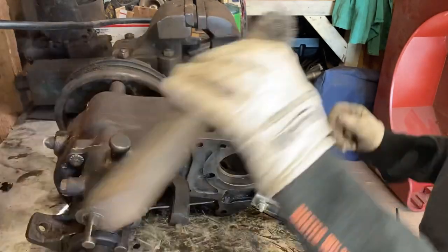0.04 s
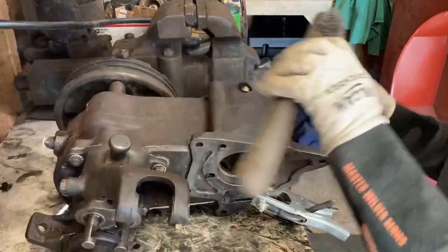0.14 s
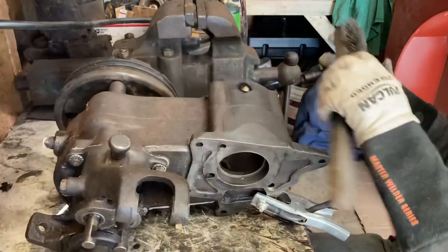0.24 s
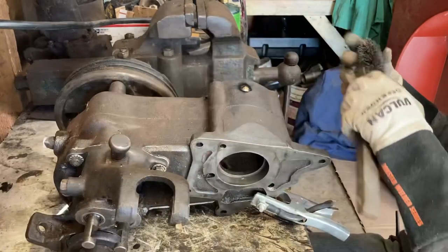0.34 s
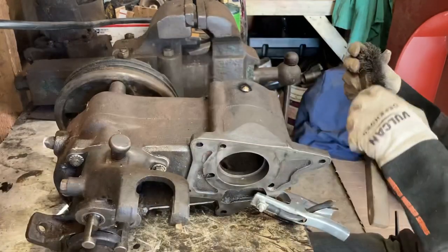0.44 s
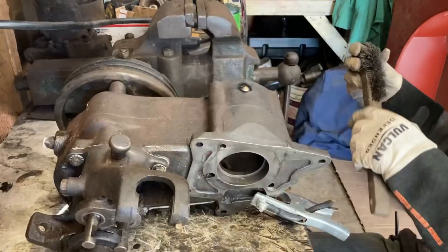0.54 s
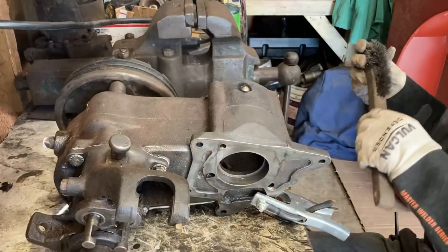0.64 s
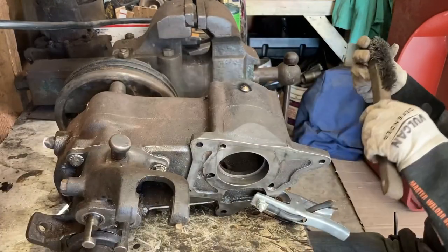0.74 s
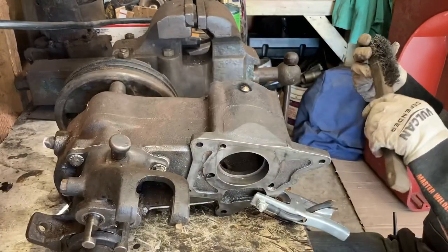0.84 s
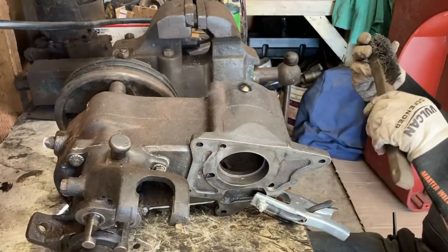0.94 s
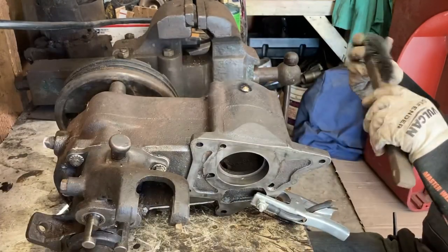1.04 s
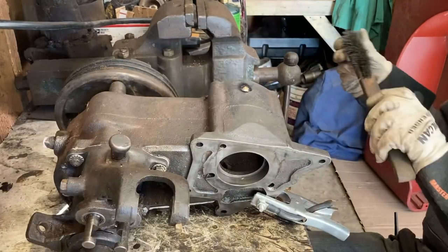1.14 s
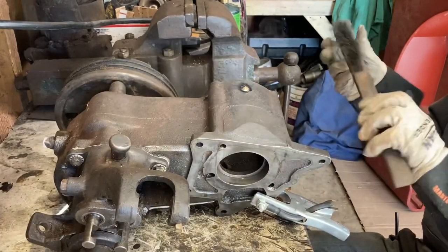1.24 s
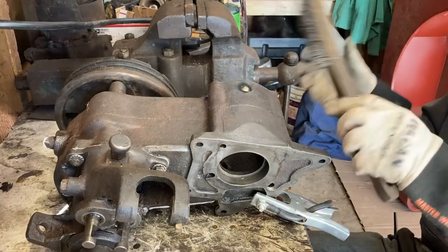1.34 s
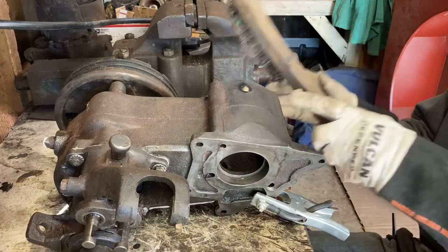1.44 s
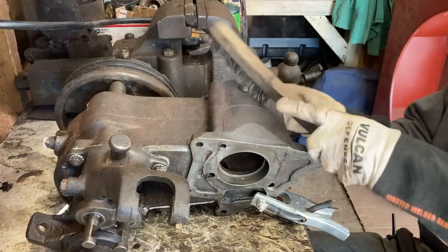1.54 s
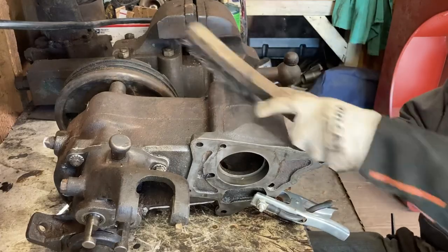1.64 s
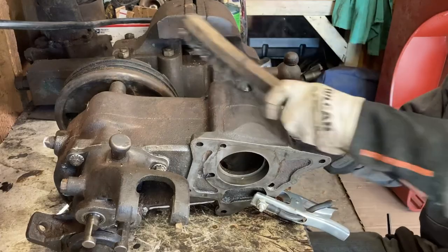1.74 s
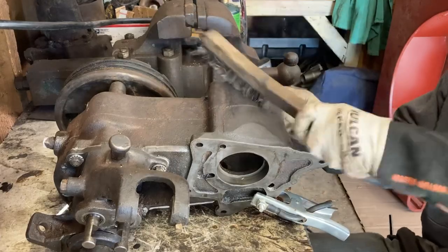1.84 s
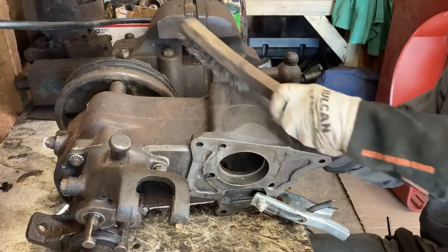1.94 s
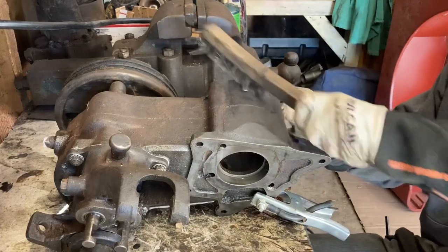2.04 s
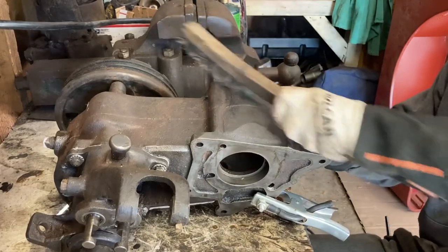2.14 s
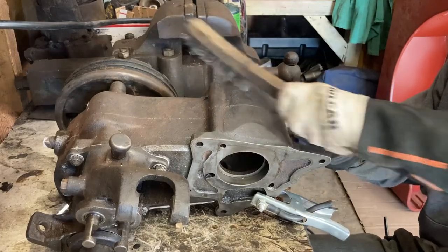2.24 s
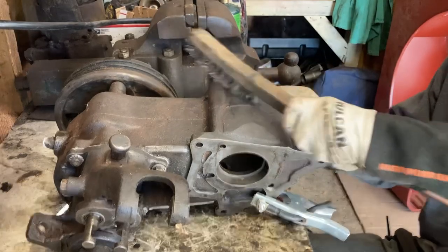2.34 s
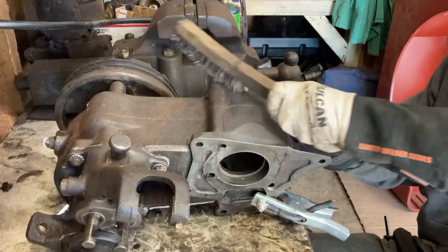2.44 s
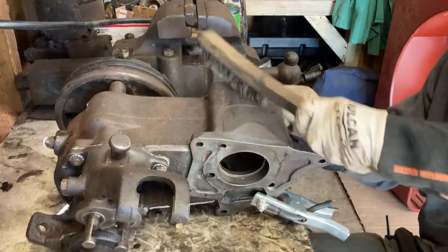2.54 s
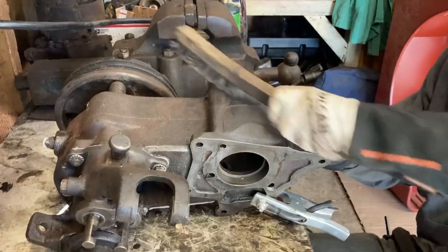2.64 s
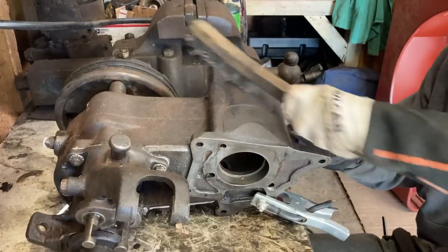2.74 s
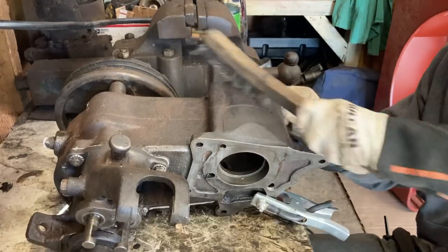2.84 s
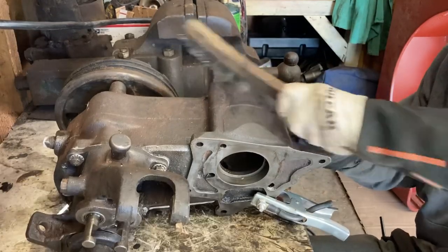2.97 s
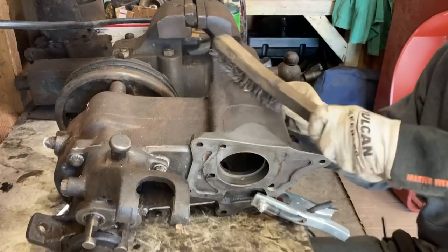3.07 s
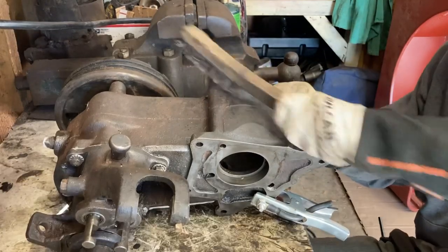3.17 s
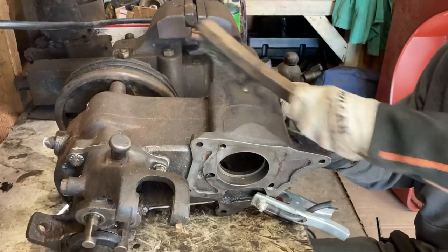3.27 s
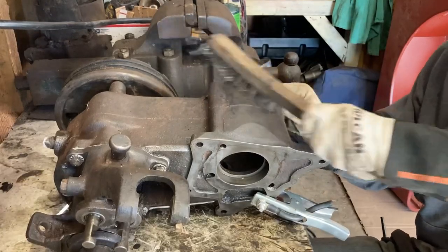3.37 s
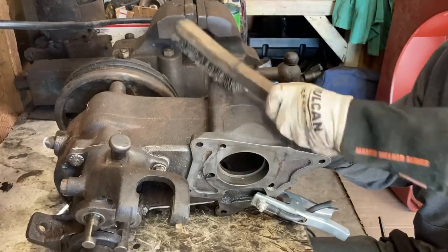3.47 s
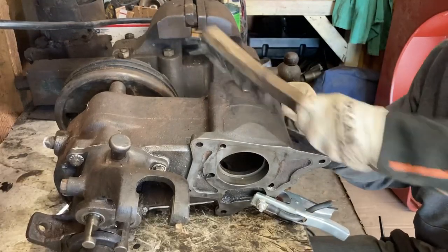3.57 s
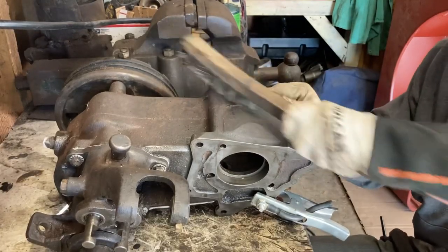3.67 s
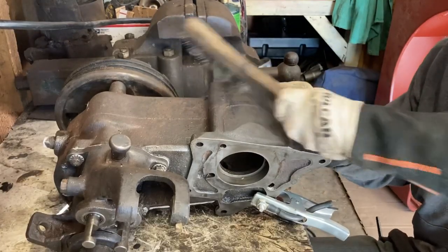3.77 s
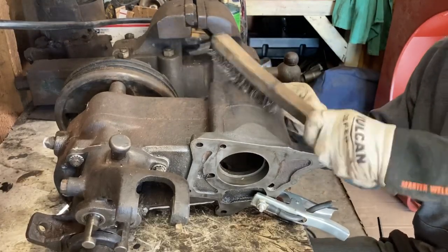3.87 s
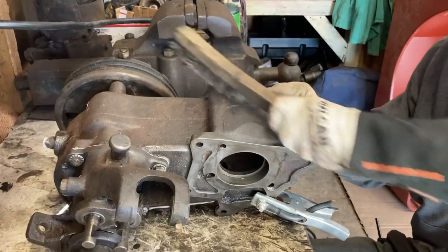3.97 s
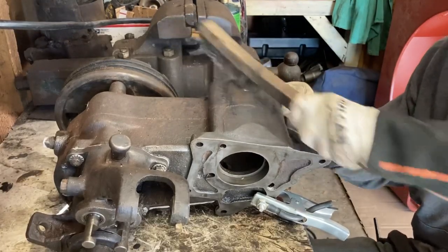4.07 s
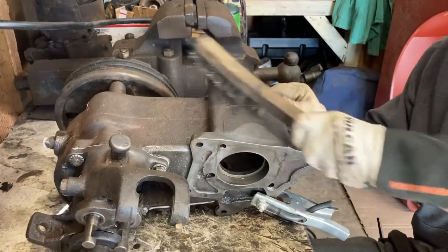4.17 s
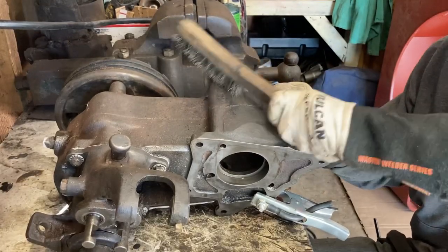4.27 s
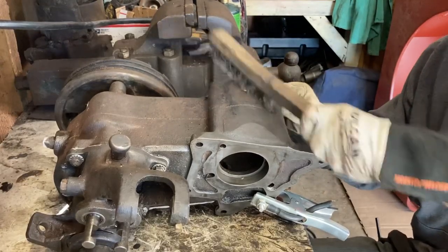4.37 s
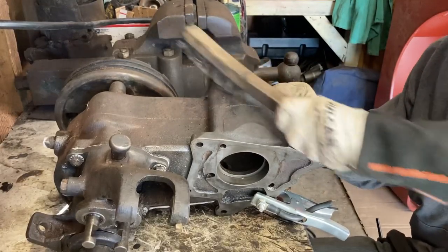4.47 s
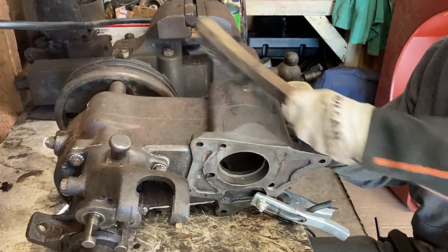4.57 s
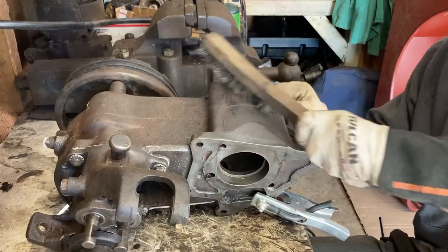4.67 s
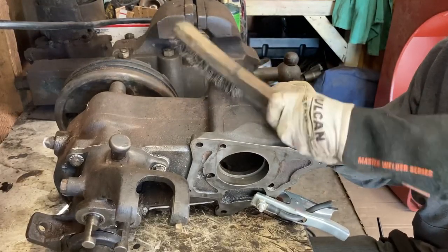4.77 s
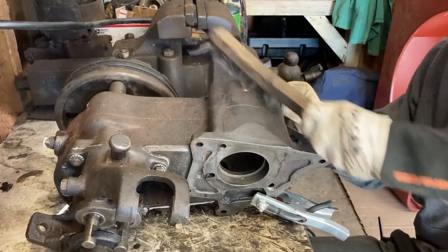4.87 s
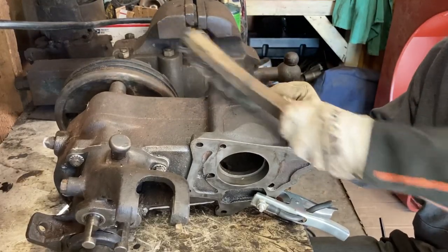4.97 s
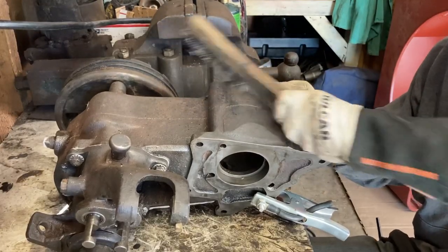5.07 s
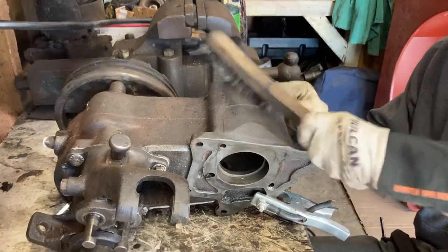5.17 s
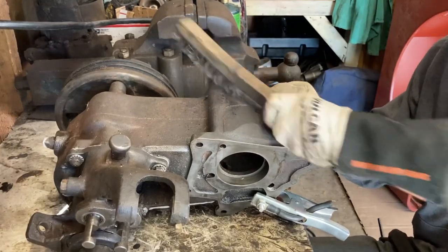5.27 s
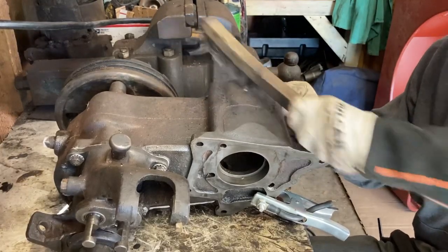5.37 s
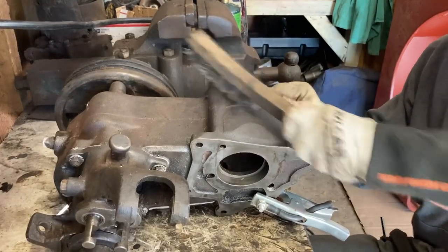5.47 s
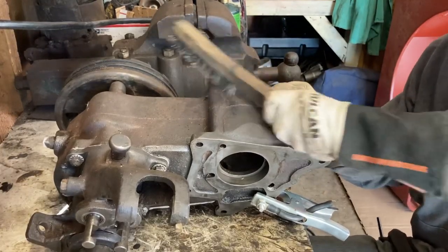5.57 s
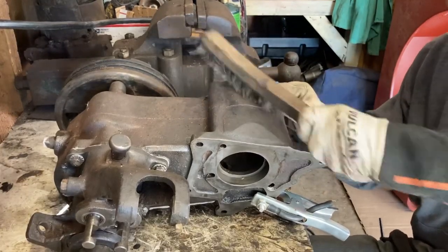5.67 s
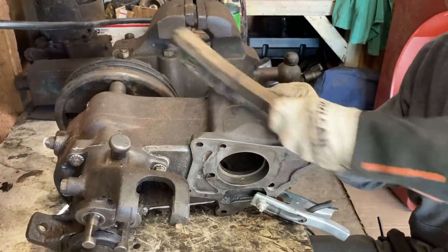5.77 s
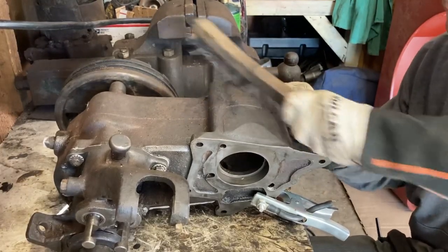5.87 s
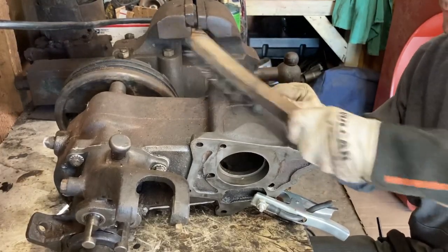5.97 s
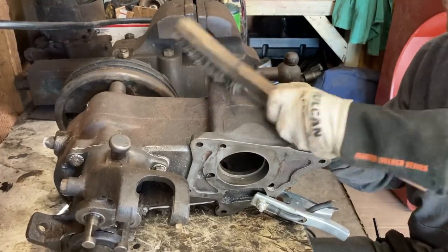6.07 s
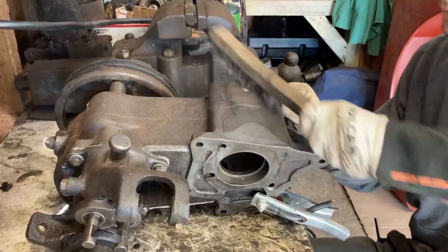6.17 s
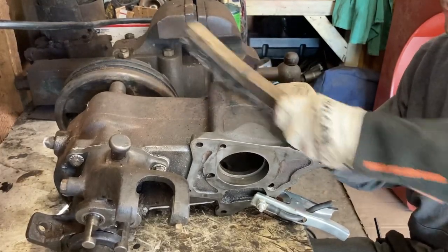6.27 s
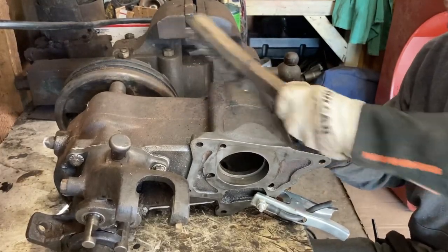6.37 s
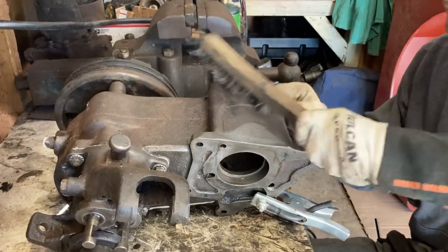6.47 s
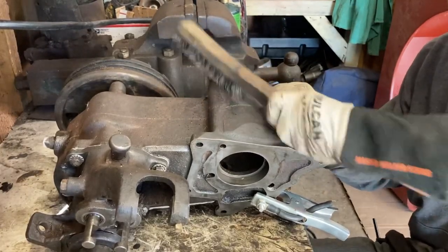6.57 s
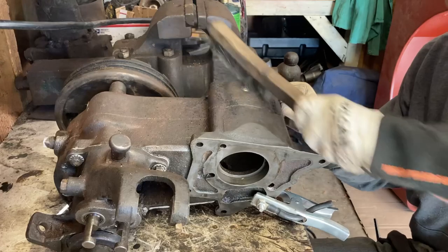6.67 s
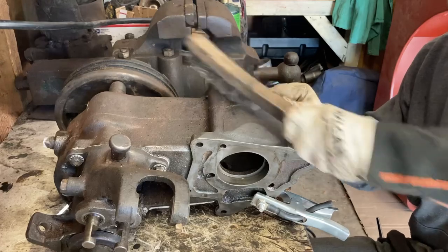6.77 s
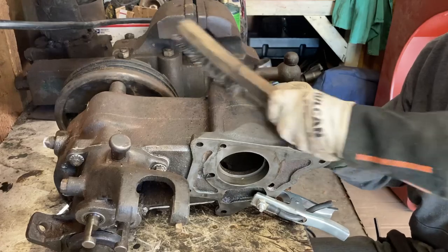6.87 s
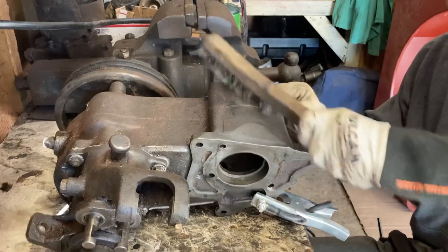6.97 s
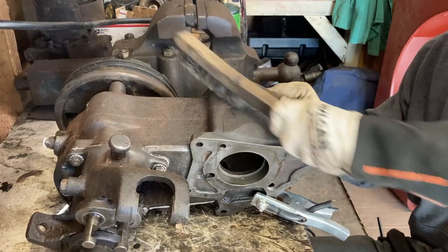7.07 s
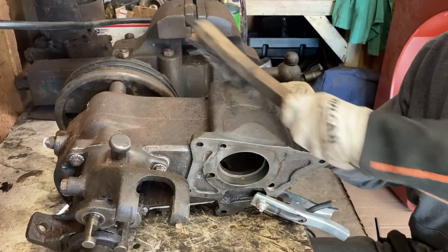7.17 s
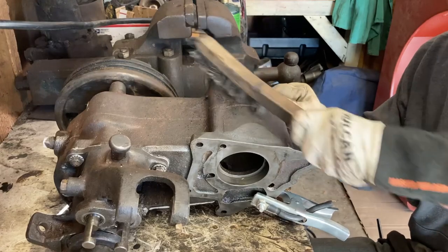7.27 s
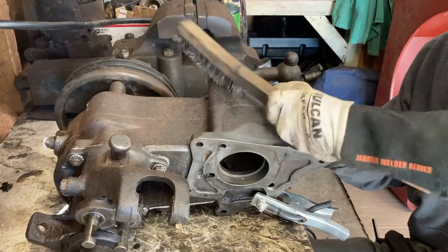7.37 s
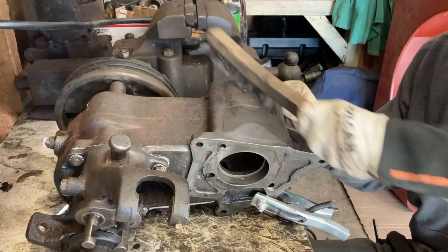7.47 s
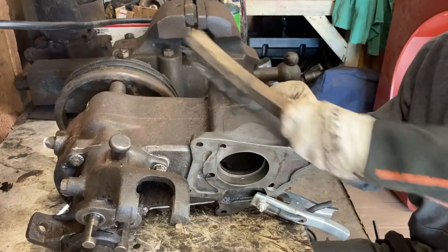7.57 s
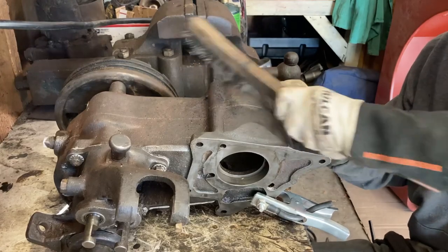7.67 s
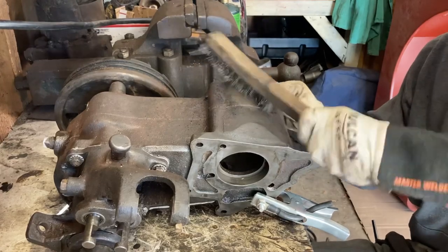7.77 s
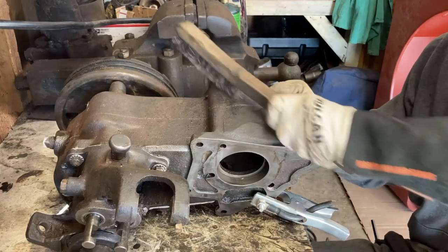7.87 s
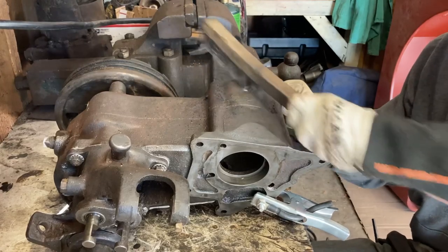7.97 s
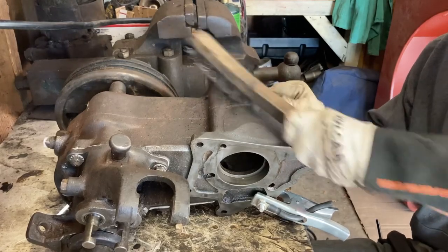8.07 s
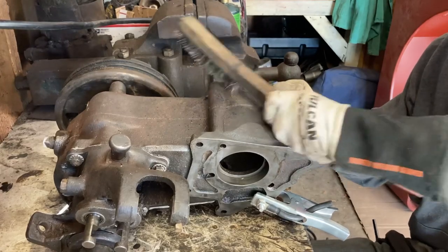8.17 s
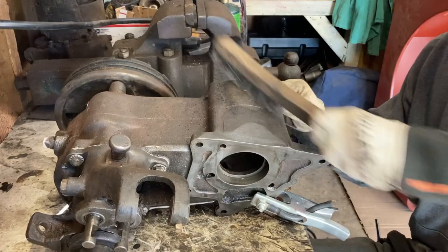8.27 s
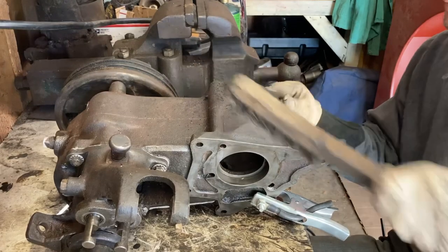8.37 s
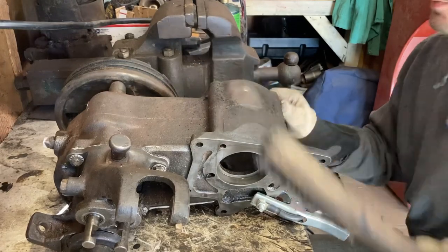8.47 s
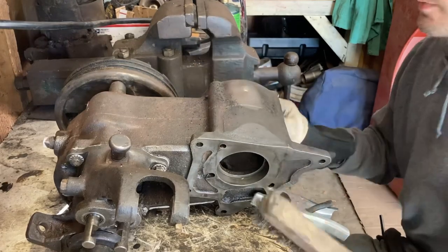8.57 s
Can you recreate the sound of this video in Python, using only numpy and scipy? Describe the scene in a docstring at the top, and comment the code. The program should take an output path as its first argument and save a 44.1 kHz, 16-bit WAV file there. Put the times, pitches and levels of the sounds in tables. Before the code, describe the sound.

A stiff wire brush scrubs metal rapidly back and forth, each push ending in a woody bump, over a low steady motor hum.

```python
"""Wire brush on a weld

A hand wire brush scrubs a weld on a cast-iron housing in a garage, almost four strokes a second.
Random slips of the steel bristles, heard directly and through the ringing iron, make a dense hiss.
Each push ends in a bump: a force pulse on the resonances of a wooden bench, which booms.
Before the brush lands, sparse slips rustle in the glove and a few wires snap free.
A motor hums behind it as a sum of shaft orders over throbbing air noise."""
import sys
import numpy as np
from scipy import signal
from scipy.fft import rfft, irfft, next_fast_len
from scipy.io import wavfile
from scipy.ndimage import uniform_filter1d, map_coordinates

SR = 44100
rng = np.random.default_rng(int(sys.argv[2]) if len(sys.argv) > 2 else 0)


def transcribe(u):
    """Save the signal u as a 16-bit wav file named by the first command-line argument.

    u: samples, shape (n,) or (channels, n), limited to [-1, 1]; the rate is SR.
    q: integer samples, one column per channel.
    """
    v = np.clip(np.atleast_2d(u).T, -1, 1)
    q = np.round(v * 32767).astype(np.int16)
    wavfile.write(sys.argv[1], SR, q)


N = 379701

# Back-and-forth strokes; levels are added to the stroke shape: start_s, turn_db, push_db, pull_db
STROKES = [(1.72, -1, -1.5, -2), (1.957, -0.5, -2.5, -1), (2.198, -0.5, -1.5, -1), (2.436, 0.5, 0.5, -1),
           (2.684, 2.5, -0.5, -0.5), (2.935, 4, -1, 1.5), (3.199, 3, -1, 2.5), (3.487, 1.5, 2.5, 0.5),
           (3.731, 0, 1, 0.5), (3.999, 1, 1, 1), (4.266, 2, -0.5, 0.5), (4.518, 0.5, 0.5, -0.5),
           (4.773, 1.5, -1.5, 2.5), (5.034, 1.5, 0, 0.5), (5.307, -1, 2, 1), (5.572, -1, 1, 0.5),
           (5.816, 1.5, 1, -0.5), (6.073, 3, -1, 0), (6.334, -1, 1, .5), (6.602, 2.5, 1.5, 1.5),
           (6.862, 0, 2, -1), (7.131, 3, 1, -1), (7.377, 1.5, 0.5, .5), (7.639, 3.5, -.5, 0),
           (7.909, 3, 0, 2.5), (8.165, 0.5, 1, -5.5)]
# Light drag to find the weld: time_s, half_length_s, level_db
FIRST_DRAG = [(1.655, 0.033, -44)]
# Level within a light stroke (turn, push, far turn, pull, turn): share_of_stroke (0-1), level_db
LIGHT_STROKE = [(0, -58.5), (.26, -30), (.37, -35.5), (.5, -45), (.68, -39.5), (.84, -42), (1, -57.5)]
# The same with the bristles held down through the turns: share_of_stroke (0-1), level_db
FIRM_STROKE = [(0, -45.5), (0.18, -36.5), (.37, -34), (.53, -37.5), (.72, -38), (.87, -41.5), (1, -46)]
# The hand leans into the work: time_s, firmness (0 light to 1 firm)
FIRMNESS = [(2.25, 0.36), (3.0, 0.45), (3.6, 0.93), (4.1, 1)]
# The brush head bumps the casting at the end of each push: time_s, force_db, squareness (0-1),
# extra_boom_db, extra_clack_db, rocking_db, rebound_scuff_db
BUMPS = [(1.79, -3.5, 0.16, 4, -1, -35, -53), (2.065, -0.5, 0.83, 2, -0.5, -43, -37.5),
         (2.3162, -0.5, 1, 2, -2.5, -34.5, -35), (2.502, -4, 0, -2.5, -3, -41, -48),
         (2.7561, -1.5, 0, -2, -0.5, -34, -54), (3.057, -0.5, 1, 2, 0, -28, -39.5),
         (3.277, -5.5, 0.3, -1, -4, -47, -61), (3.556, -1.5, 0, 1.5, 3, -38, -49),
         (3.8225, -2.5, 0.07, -2.5, -2, -39, -48), (4.086, -4, .05, -2, -7, -45, -58),
         (4.347, -1.5, 0.06, -1.5, -1, -36, -47), (4.615, 0, .02, 2, 1, -35, -42),
         (4.8745, -0.5, 0.01, 2, 1, -34, -51), (5.14, -0.2, 0.2, 4, 1, -36, -52),
         (5.4088, 1.7, 0.72, 0.5, 0.5, -32.5, -45), (5.632, 0, 0, -0.5, -2.5, -39, -53),
         (5.871, -11, 0.6, 1.5, -8, -45, -57), (6.139, -1, 0.2, -14, -5, -37, -51),
         (6.4135, -1.6, 0.24, -1.5, 0.5, -39, -46), (6.6748, 0, 0.05, -2, 0.5, -43, -49),
         (6.9485, 1, 0, 3, 1, -30.5, -49), (7.196, -2.5, 0.2, -3, -8, -49, -59),
         (7.4642, 0.5, 0, -1, 2, -44, -53), (7.7215, -1, 0, -2, 2, -45, -49),
         (7.9962, 1.5, 0, 1, 1, -30, -44), (8.263, -0.2, 0, 1, 0.5, -35, -42)]
# The casting stirs as the brush lands: time_s, half_length_s, level_db
LANDING_ROCK = [(1.554, 0.028, -39)]
# Single wires snap free: time_s, level_db, metal_share (0-1)
SNAPS = [(0.074, -33.5, 0.08), (0.388, -39, 0.25), (0.601, -50, 0.4), (1.102, -35, 0.5), (1.125, -45, .5),
         (1.169, -45, .6), (1.184, -41, 0.7), (1.527, -25.5, 1), (1.557, -35.5, .8), (8.24, -25, 0.2)]
# Bristles rustle in the glove: time_s, half_length_s, level_db
RUSTLES = [(.315, 0.0072, -59), (.4, 0.039, -65), (.52, 0.037, -60), (1.115, 0.037, -56.5),
           (1.187, 0.011, -54.5), (1.275, 0.018, -66), (1.37, 0.029, -61), (1.57, 0.049, -64.5)]
# Casting on its bench: pitch_hz, width_hz, glancing_hit_db, square_hit_extra_db
BENCH_MODES = [(53.6, 5.5, -11.5, 3.5), (103, 9, -5.5, 1), (150.2, 16.4, -6.5, -1.5),
               (218.7, 32, -15.5, 13), (298.6, 30, -15, 8.5), (368.6, 14.7, -18.5, 9),
               (430.4, 26, -8.5, -3), (510.2, 29.2, -12.5, -4.5), (635, 26, -24, 8.5), (783, 47, -29, 7.5),
               (935, 40, -27.5, 13), (1029, 30, -31, 16.5), (1084, 50, -32.5, 9)]
# Iron and brush ringing under the bristles, relative levels: pitch_hz, width_hz, level_db
IRON_MODES = [(1121, 22, 7), (1480, 480, -4.5), (1790, 126, -0.5), (1970, 37, 3), (2670, 360, 0),
              (2993, 104, 5), (3150, 66, 4.5), (4150, 38, 5), (4360, 77, 5.5), (5300, 103, -21),
              (5760, 150, 3), (7240, 330, 4.5), (8000, 55, -7)]
# Spectrum of the wire tips, relative levels: pitch_hz, level_db
WIRE_SPECTRUM = [(300, -88), (700, -8), (1500, -19), (2300, -14.5), (3200, -21), (3750, -21), (4400, -6.5),
                 (6300, -10), (7400, -3.5), (9200, -3), (12000, -1), (14200, -7.5), (15800, -5)]
# A wire striking the iron, relative levels: pitch_hz, level_db, t60_s
PING_MODES = [(1820, -1, 0.02), (2470, 1, .018), (3030, 7, 0.022), (3630, -7, 0.017), (4300, 4, 0.04),
              (5770, -15, 0.055), (7000, -9, .035), (7960, -8, .033)]
# Motor hum: shaft_order, level_db (before it wavers), waver_db, phase_wander_rad
HUM_ORDERS = [(1, -78, 2, .4), (2, -48.5, 1.3, 0.28), (3, -45, 2.5, .3), (4, -48, 3, 1.16),
              (6.72, -63, 2.5, 0.41), (7, -69.5, 1, .5)]
# Air noise of the motor and the garage, relative levels: pitch_hz, level_db
AIR_SPECTRUM = [(22, -39), (40, -26), (58, -14), (85, -13.5), (125, -18), (190, -10), (225, -1.5),
                (280, -9.5), (335, -21.5), (390, -20.5), (480, -10.5), (530, -33.5), (590, -17.5),
                (660, -27.5), (760, -20.5), (1000, -29.5), (1200, -24.5), (1500, -33), (2200, -38.5),
                (4500, -46), (8500, -55.5), (16000, -102)]
# Likeness of left and right: pitch_hz, coherence (0-1)
COHERENCE = [(100, 0.83), (300, 0.95), (600, 0.76), (1200, 0.5), (2800, 0.54), (3700, 0.2), (4400, 0.97),
             (6000, 0.073), (7400, 0.88), (9200, 1), (11400, 0.75), (13600, 1), (15000, 0.72)]
# Phase difference between the channels, left minus right: pitch_hz, phase_rad
CHANNEL_PHASE = [(1300, 0), (1800, .7), (2900, .4), (3750, 1.4), (4400, .2), (5000, 2), (6200, 1),
                 (6900, 0), (8000, -1.6), (9200, -3.2), (11300, -6.3), (13600, -9.4), (15500, -12.6)]
# Decay of the room: pitch_hz, t60_s
ROOM_DECAY = [(100, 0.043), (1000, 0.22), (5000, 0.21), (15000, 0.031)]

TOP_HZ = 15850  # upper limit of the sound
LIFT_S, LIFT_DB_PER_S = 8.293, 1801  # the brush leaves the weld; how fast the scrub dies
HELD_DB = -80  # bristles stirring faintly between rustles
LANDING_S, LANDING_DB, LANDING_HZ = 1.536, -4.5, 190  # cushioned first contact: dull above this pitch
BOOM_HZ, CLACK_HZ = 180, 580  # below the first the whole bench moves; above the second only the casting
# Delay after a bump and half length, both for a glancing hit
ROCK_S, ROCK_HALF_S = 0.037, 0.016  # the casting rocks on the bench
SCUFF_S, SCUFF_HALF_S = 0.045, 0.0085  # the head bounces and scuffs the iron again
SQUARE_ROCK, SQUARE_SCUFF = .45, .22  # share by which a fully square hit draws each of them out
GRIND_S, GRIND_HALF_S, GRIND_DB = .018, .006, -38.5  # the head grinds on: delay, half length, dB over force


def scrubbing(flick_rate=9000, tuft_db=.9, hiss_db=0.5, twang_db=-6, zing_db=-15.0, ring_db=-11.0,
              ring_follow=0.59, rumble_db=-15, rumble_follow=0.81, usual_db=-36):
    """Stick-slip friction: a stronger stroke frees more wires a second, and whole tufts let go together."""
    effort_db = stroke_level() - usual_db
    tufts = amp(tuft_db * wobble(90) + 0.58 * wobble(28))

    def slips():
        return tufts * flicks(flick_rate * amp(effort_db / 2), spread_db=1.0)

    hiss = amp(hiss_db + effort_db) * wire_hiss(slips())
    twang = amp(twang_db + effort_db) * twangs()
    # the ring follows effort less than the hiss does, so weak strokes sound duller
    ring = amp(ring_db + ring_follow * effort_db) * iron_ring(slips())
    # friction shakes the bench
    drag = unit(filtered(stereo(slips()), lambda hz: resonances(BENCH_MODES, hz) * soft_contact(hz)))
    rumble = amp(rumble_db + rumble_follow * effort_db) * drag
    # long wires flip over the weld bead
    zing = amp(zing_db + effort_db) * twangs(rate=340, centre_hz=4290, scatter=.33, spread_db=1)
    return amp(usual_db) * (scratchy(hiss + ring) + twang + zing + rumble)


def stroke_level(last_length=0.22, push_share=.3, pull_share=.72):
    """Amplitude modulation in dB by push and pull; leaning on the brush fills the gaps at the turns."""
    t = np.arange(N) / SR
    strokes = np.array(STROKES)
    starts, strength_db = strokes[:, 0], strokes[:, 1:]
    count = len(starts)
    moments = np.arange(count)[:, None] + [0, push_share, pull_share]
    progress = np.interp(t, np.append(starts, starts[-1] + last_length), np.arange(count + 1))
    light = np.interp(progress % 1, *np.transpose(LIGHT_STROKE))
    firm = np.interp(progress % 1, *np.transpose(FIRM_STROKE))
    shape = light + np.clip(curve(FIRMNESS), 0, 1) * (firm - light)
    level = shape + np.interp(progress, moments.ravel(), strength_db.ravel())
    lift_db = LIFT_DB_PER_S * np.maximum(t - LIFT_S, 0)
    scrub = (t > starts[0]) * amp(level - lift_db)
    return 20 * np.log10(np.maximum(scrub, swells(FIRST_DRAG)) + 1e-9)


def flicks(rate, spread_db):
    """Shot noise: wire tips slip at random, rate times a second, in very unequal sizes."""
    chance = np.clip(rate / SR, 1e-4, 1) * np.ones(N)
    size = amp(spread_db * np.clip(rng.standard_normal(N), -2.5, 2.5))
    slipping = rng.random(N) < chance
    # dividing by the root of the chance keeps the power steady as the rate changes
    return unit(slipping * size / np.sqrt(chance) * rng.standard_normal((2, N)))


def wire_hiss(slips):
    """Direct radiation: slips heard straight from the thin steel wires, shaped by their spectrum."""
    return unit(filtered(stereo(slips), lambda hz: amp(along(WIRE_SPECTRUM, hz))))


def iron_ring(slips, roam_db=2.0, count=7):
    """Modal excitation: slips ring the metal, and the moving contact favours different resonances."""
    pair = stereo(slips)
    ring = 0
    for k in range(count):
        group = filtered(pair, lambda hz: resonances(IRON_MODES[k::count], hz))
        ring = ring + amp(roam_db * wobble(8.2)) * group
    return unit(ring)


def twangs(rate=560, centre_hz=10200, scatter=0.2, spread_db=2):
    """Damped free vibration: single wires spring back, each at its own pitch, and soon die away."""
    count = int(rate * N / SR)
    when = rng.random((count, 1))
    pitch, size, side = rng.standard_normal((3, count, 1))
    t = np.arange(SR // 45) / SR
    hz = centre_hz * np.exp(scatter * pitch)
    fade = 1 - t / t[-1]  # neighbouring wires damp it
    ring = (hz < TOP_HZ) * amp(spread_db * size) * fade * np.sin(2 * np.pi * hz * t)
    at = (when * N).astype(int) + np.arange(len(t))
    pair = [np.bincount(at.ravel(), (ring * gain).ravel(), N)[:N] for gain in (1, side)]
    return unit(stereo(np.array(pair)))


def scratchy(x):
    """Time-varying spectrum: tufts cross the weld ridges, and patches of the scrape flare up and fade."""
    depth_db = [(900, 0), (2000, 1.6), (4000, 2), (6500, 2), (10000, 1)]  # (pitch_hz, depth_db)
    hz, _, z = signal.stft(x, SR, nperseg=1024)
    field = rng.standard_normal(z.shape[1:])
    field = uniform_filter1d(field, size=3, axis=0)  # over pitch
    field = uniform_filter1d(field, size=5, axis=1)  # over time
    gain = amp(along(depth_db, hz)[:, None] * unit(field))
    gain = gain / np.sqrt(np.mean(gain ** 2, axis=1, keepdims=True))
    return signal.istft(z * gain, nperseg=1024)[1][:, :N]


def bumps(knock_db=-60, side_db=-12.0, lag_s=0.02985, lag_hz=65):
    """Impulse response with dispersion: a short woody knock, then the heavy bench's low boom."""
    lead_s, scatter_db, detune = .01, 1.3, .018
    size = SR // 2
    hz = np.fft.rfftfreq(size, 1 / SR)
    delay = lag_s * lag_hz * np.arctan(hz / lag_hz) + hz * lead_s  # in cycles: only the bass lags
    travel = SR * amp(knock_db) * soft_contact(hz) * np.exp(-2j * np.pi * delay)
    out = np.zeros((2, N))
    for s, force_db, square, boom_db, clack_db, *_ in BUMPS:
        chance = rng.standard_normal((len(BENCH_MODES), 2))  # the casting sits a little differently each time
        modes = []
        for (c, w, level, square_db), (a, b) in zip(BENCH_MODES, chance):
            level = level + square * square_db + scatter_db * b
            level += boom_db * (c < BOOM_HZ) + clack_db * (c > CLACK_HZ)
            modes.append((c * (1 + detune * a), w, level))
        mid = resonances(modes, hz)
        # short waves beam unevenly
        side = amp(side_db) * sum(rng.standard_normal() * resonances([m], hz) for m in modes if m[0] > 340)
        knock = irfft(np.array([mid + side, mid - side]) * travel, size)
        add(out, s - lead_s, amp(force_db) * knock)
    thud = resonances(BENCH_MODES, hz) * travel / (1 + 1j * hz / LANDING_HZ) ** 2
    add(out, LANDING_S - lead_s, amp(LANDING_DB) * irfft(thud, size))
    return out


def shudder(rock_hz=109, wander=0.87, rock_db=-3.5, rumble_db=-7.0):
    """Repeated contact after impact: the casting rocks unevenly, the head grinds and scuffs on rebound."""
    s, force_db, square, _, _, rocking_db, scuff_db = np.transpose(BUMPS)
    longer = 1 + SQUARE_ROCK * square
    rocking = swells(zip(s + ROCK_S * longer, ROCK_HALF_S * longer, rocking_db)) + swells(LANDING_ROCK)
    later = 1 + SQUARE_SCUFF * square
    scuffing = swells(zip(s + SCUFF_S * later, SCUFF_HALF_S * later, scuff_db))
    grinding = swells([(at + GRIND_S, GRIND_HALF_S, db + GRIND_DB) for at, db in zip(s, force_db)])
    rock = unit(np.sin(2 * np.pi * rock_hz * np.arange(N) / SR + wander * wobble(60)))
    rumble = bench_rattle(low_hz=42, high_hz=210)
    rocked = rocking * (amp(rock_db) * rock + amp(rumble_db) * rumble)
    return rocked + (grinding + scuffing) * bench_rattle(low_hz=340, high_hz=800)


def bench_rattle(low_hz, high_hz):
    """Random excitation: dense small contacts shake the bench within a band."""
    contacts = stereo(rng.standard_normal((2, N)))
    return unit(filtered(contacts, lambda hz: resonances(BENCH_MODES, hz) * soft_contact(hz, low_hz, high_hz)))


def soft_contact(hz, low_hz=34, high_hz=1250):
    """Band-limited coupling: the vibration that the bench takes up and radiates."""
    return 1 / (1 + (hz / high_hz) ** 8) / (1 + (low_hz / (hz + 1)) ** 8)


def handling(hiss_db=-2, ring_db=-9):
    """Sparse stick-slip: a faint crackle of the bristles against the glove, swelling into rustles."""
    slips = flicks(4500, spread_db=4.5)
    crackle = amp(hiss_db) * wire_hiss(slips) + amp(ring_db) * iron_ring(slips)
    return (amp(HELD_DB) + swells(RUSTLES)) * crackle


def ticks(t60=0.041, wire_db=-10, ping_db=-14, grit_db=6.5, attack_s=0.00023):
    """Sudden release: a wire snaps free and chatters briefly; on metal it also excites a clear tink."""
    t = np.arange(SR // 10) / SR
    grit_band = signal.butter(2, [1500, 6500], 'bandpass', fs=SR, output='sos')
    snaps, tinks = np.zeros((2, 2, N))
    for s, db, on_metal in SNAPS:
        add(snaps, s, amp(db - 60 * t / t60) * rng.standard_normal((2, len(t))))
        ring = np.zeros(len(t))
        for hz, level, life in PING_MODES:
            decay = amp(level + rng.normal(0, 1.6) - 60 * t / life)
            ring += decay * np.sin(2 * np.pi * hz * rng.normal(1, 0.012) * t)
        # the tip skids as it strikes
        ring += amp(grit_db - 60 * t / t60) * signal.sosfilt(grit_band, rng.standard_normal(len(t)))
        add(tinks, s, on_metal * amp(db + ping_db) * (1 - np.exp(-t / attack_s)) * ring)
    return filtered(stereo(snaps), lambda hz: amp(wire_db + along(WIRE_SPECTRUM, hz))) + tinks


def motor(shaft_hz=56.78, drift=0.003, air_db=-47, throb=0.12):
    """Order synthesis: multiples of the shaft rate waver in level and phase over air throbbing each turn."""
    phase = 2 * np.pi * np.cumsum(shaft_hz * (1 + drift * wobble(2.043))) / SR
    hum = 0
    for order, db, waver_db, wander in HUM_ORDERS:
        level = np.sqrt(2) * amp(db + waver_db * wobble(14))
        hum = hum + level * np.cos(order * phase + wander * wobble(15))
    air = unit(filtered(stereo(rng.standard_normal((2, N))), lambda hz: amp(along(AIR_SPECTRUM, hz))))
    return hum + amp(air_db + wobble(5)) * air * (1 + throb * np.cos(phase))


def garage(x):
    """Diffuse reverberation: convolution with decaying noise whose mid frequencies last longest."""
    hz, t, z = signal.stft(rng.standard_normal((2, SR // 2)), SR, nperseg=256)
    decay = amp(-60 * t / along(ROOM_DECAY, hz)[:, None])
    tail = signal.istft(z * decay, SR, nperseg=256)[1]
    return signal.fftconvolve(x, tail / np.linalg.norm(tail[0]), axes=1)[:, :N]


def stereo(pair):
    """Interchannel coherence: two unrelated signals mix into left and right of a set likeness."""
    def turn(hz):
        return np.arccos(np.clip(along(COHERENCE, hz), -1, 1)) / 2

    mid, side = filtered(pair, lambda hz: np.array([np.cos(turn(hz)), np.sin(turn(hz))]))
    return np.array([mid + side, mid - side])


def resonances(modes, hz):
    """Modal superposition: causal response of damped modes of alternating sign."""
    total = 0
    for k, (c, w, db, *_) in enumerate(modes):
        total = total + (-1) ** k * amp(db) * 1j * hz * w / (c * c - hz * hz + 1j * hz * w)
    return total


def filtered(x, response):
    """Linear filtering: x times a complex response of frequency."""
    m = next_fast_len(N + SR // 2)
    return irfft(rfft(x, m) * response(np.fft.rfftfreq(m, 1 / SR)), m)[..., :N]


def swells(rows):
    """Gaussian envelopes: the summed gain of (time_s, half_length_s, level_db) swells."""
    gain, t = np.zeros(N), np.arange(-SR // 4, SR // 4) / SR
    for s, half, db in rows:
        add(gain, s + t[0], amp(db) * np.exp(-.5 * (t / half) ** 2))
    return gain


def wobble(rate):
    """Slow random modulation: a smooth curve through rate random knots a second."""
    knots = rng.standard_normal(int(N * rate / SR) + 4)
    return map_coordinates(knots, [np.arange(N) * rate / SR])


def curve(rows):
    """Linear interpolation in time: (time_s, value) rows, one value per sample."""
    return np.interp(np.arange(N) / SR, *np.transpose(rows))


def along(points, hz):
    """Interpolation in log frequency: (pitch_hz, value) points."""
    f, v = np.transpose(points)
    return np.interp(np.log(hz + 1), np.log(f + 1), v)


def add(track, s, sound):
    """Superposition: mix a sound in at time s."""
    part = track[..., max(round(s * SR), 0):][..., :sound.shape[-1]]
    part += sound[..., :part.shape[-1]]


def amp(db):
    """Decibel law: level to amplitude ratio."""
    return 10 ** (np.asarray(db) / 20)


def unit(x):
    """Normalization: scale to an rms of one."""
    return x / np.sqrt(np.mean(x ** 2) + 1e-20)


def scene(room_db=-19, boom_room_db=-18, left_db=2.0):
    """Interchannel phase: in one layer left and right differ in phase by pitch; the bench boom is in step."""
    brush = scrubbing() + handling() + ticks()
    # the low scrape leans to the left: left gains this level and right loses it (pitch_hz, gain_db)
    lean = [(600, 0.03), (1400, left_db), (2600, 0.011)]

    def channel_offset(hz):
        return amp(along(lean, hz)) * np.exp(.5j * along(CHANNEL_PHASE, hz))

    # left takes the offset and right its inverse
    brush = filtered(brush, lambda hz: channel_offset(hz) ** np.array([[1], [-1]]))
    boom = bumps() + shudder()
    room = garage(amp(room_db) * brush + amp(boom_room_db) * boom)
    return brush + boom + room + motor()


def record(dry):
    """Band limitation: an abrupt low-pass removes everything above the upper limit."""
    return filtered(dry, lambda hz: hz < TOP_HZ)


dry = scene()
out = record(dry)
transcribe(out)
```